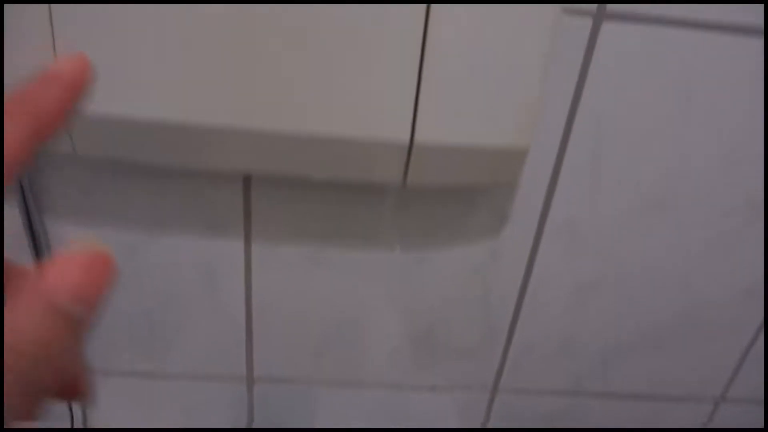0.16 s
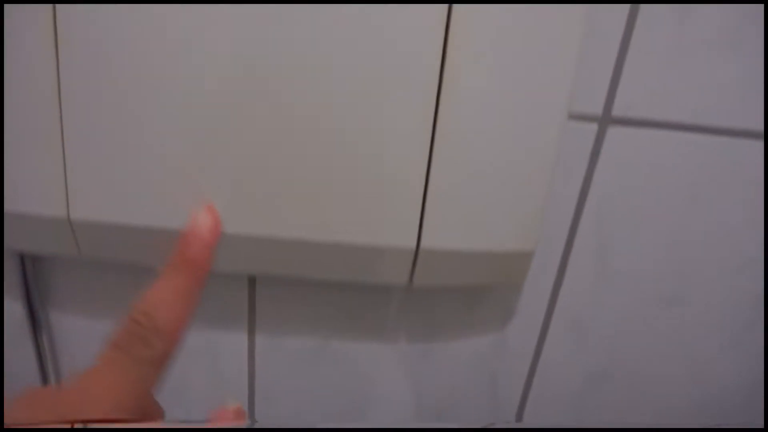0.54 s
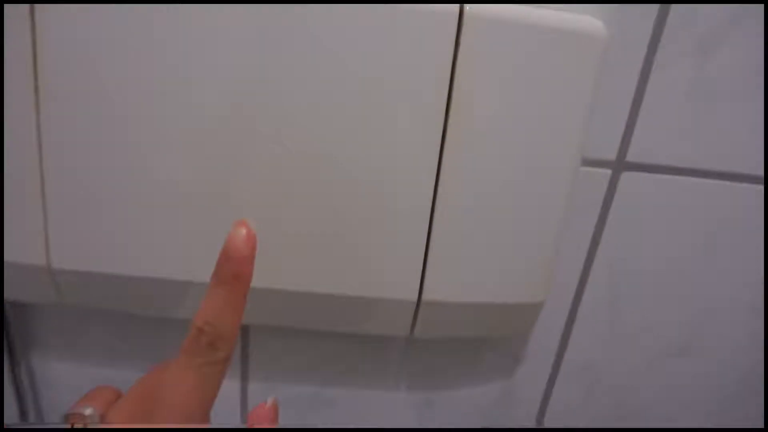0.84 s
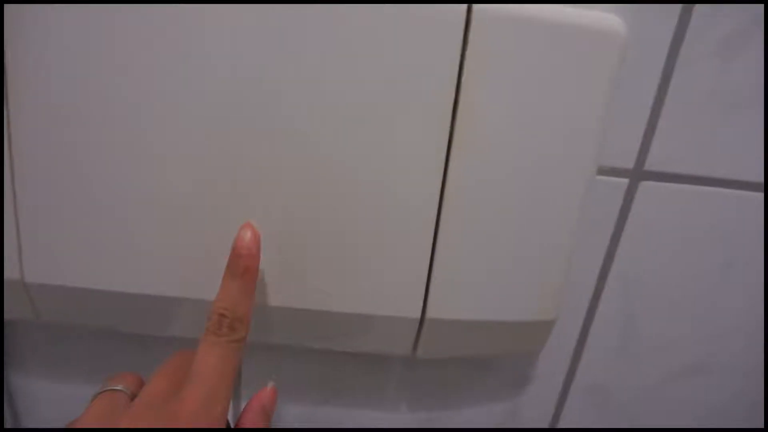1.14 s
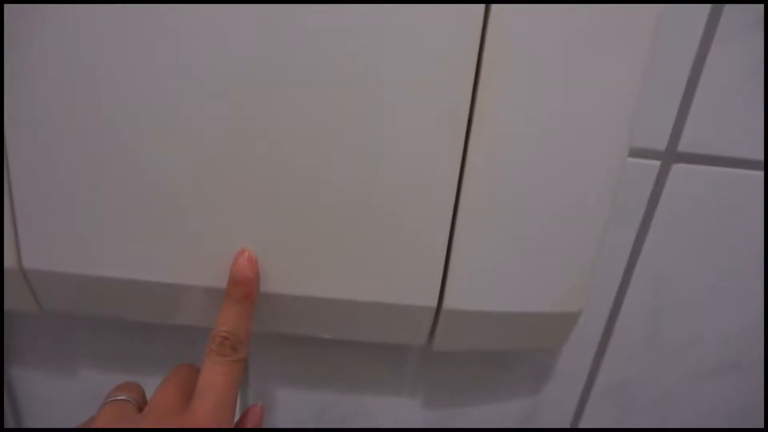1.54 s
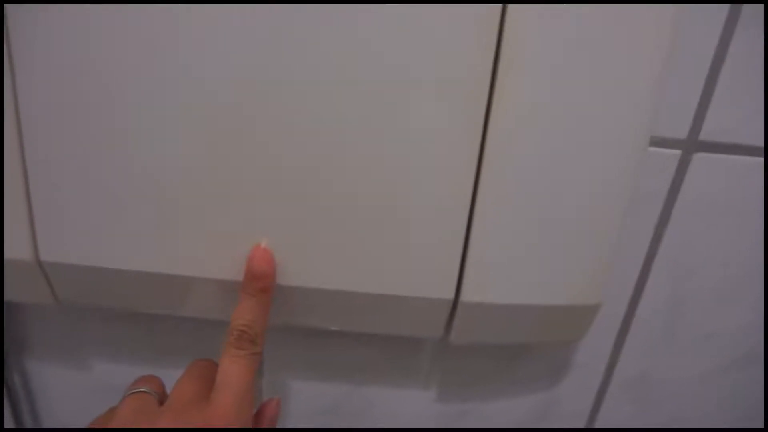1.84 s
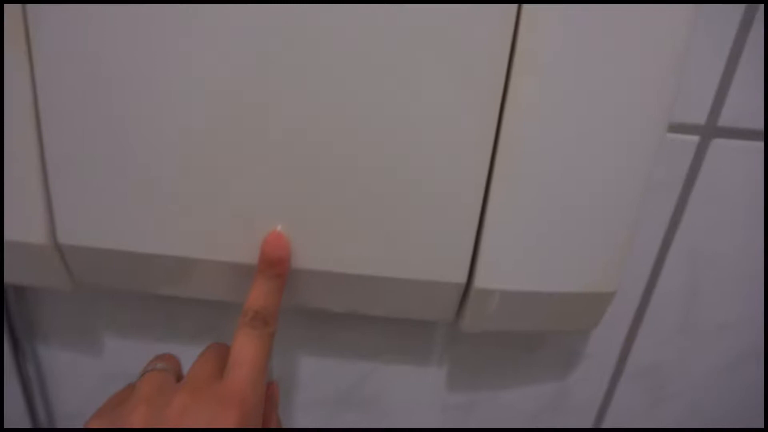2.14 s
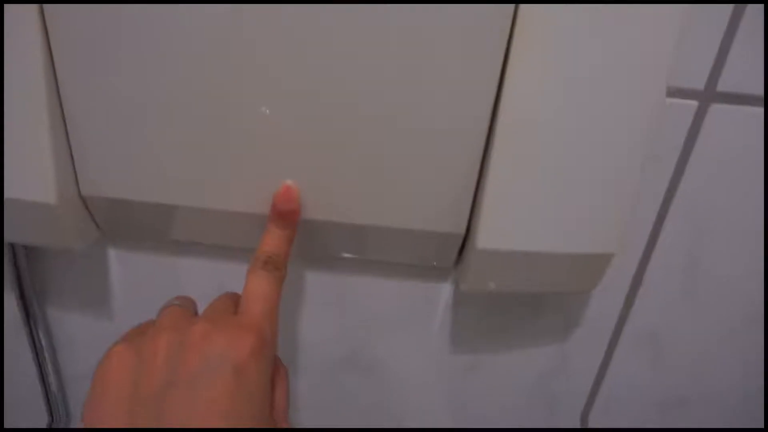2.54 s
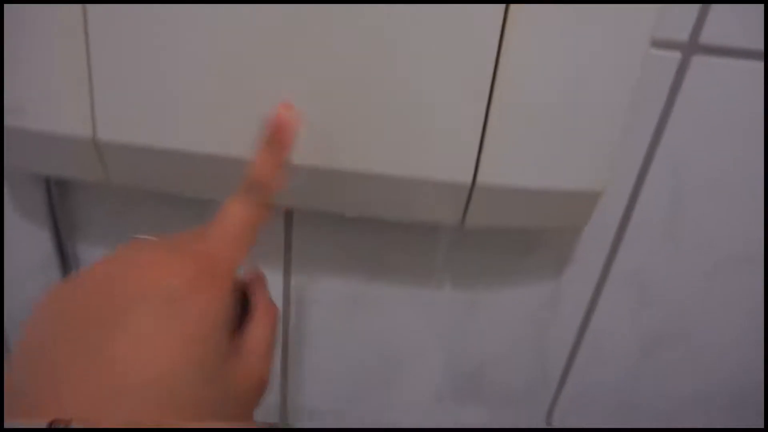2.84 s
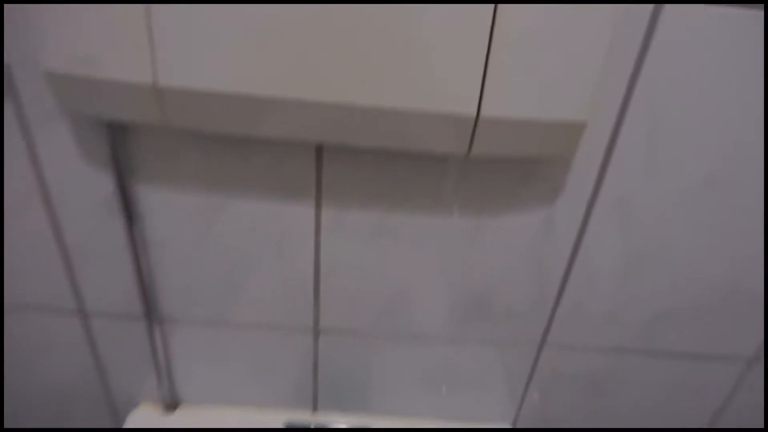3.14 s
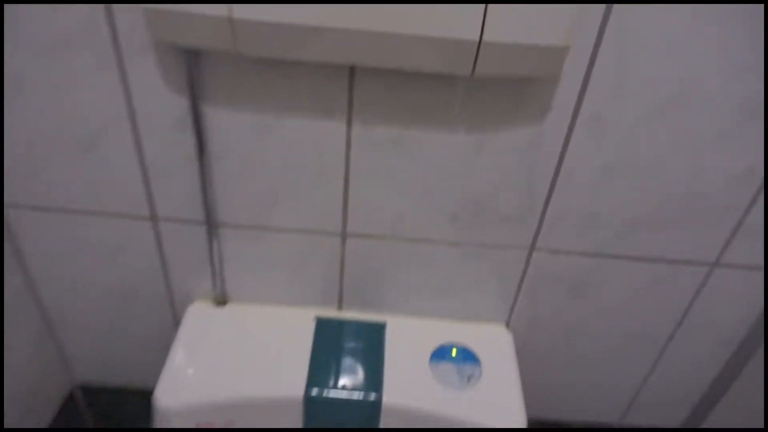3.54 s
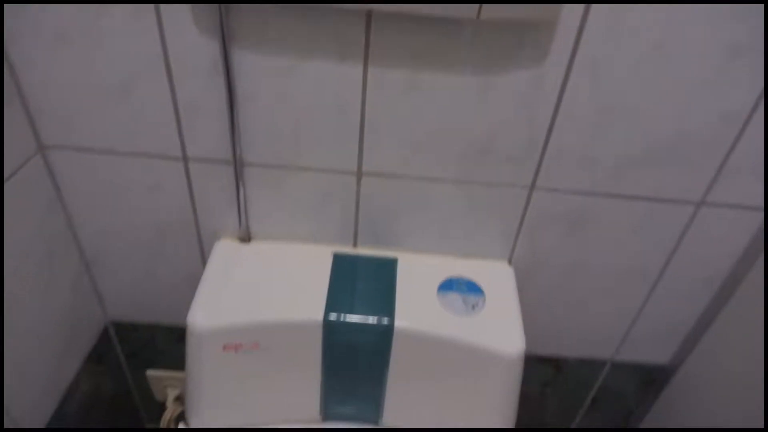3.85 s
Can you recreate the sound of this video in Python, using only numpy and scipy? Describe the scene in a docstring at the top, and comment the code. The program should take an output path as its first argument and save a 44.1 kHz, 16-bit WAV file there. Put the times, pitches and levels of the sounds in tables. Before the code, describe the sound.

A toilet flush in a small tiled restroom: near silence, light plastic clicks as a finger presses the cistern plate, a sharp clack, then gulping water bursts into a loud splashing rush, recorded close with a handheld stereo microphone.

```python
"""A small tiled restroom hums quietly, with soft air noise and a faint electrical whine: noise and sines.
Close by, a finger presses the plastic plate of a wall cistern: cracks of noise and decaying rings click and knock.
The valve jolts the pipe, air gulps as rising tones, and squirts of water sing through narrow resonances.
Water bursts into the bowl and settles into a loud rush of rumble, bubbles, splashes and spray.
Two microphones in a swaying hand hear it all, alike in the bass and apart in the treble."""
import sys
import numpy as np
from scipy import signal
from scipy.fft import rfft, irfft
from scipy.io import wavfile

SR = 44100
rng = np.random.default_rng(int(sys.argv[2]) if len(sys.argv) > 2 else 0)


def materialize(psi):
    """Save the field psi as 16-bit PCM at rate SR to the path in sys.argv[1].

    A 1-D psi becomes a single channel; in a 2-D psi each row is a channel.
    """
    bounded = np.clip(np.atleast_2d(psi).T, -1, 1)
    quanta = np.round(bounded * 32767).astype(np.int16)
    wavfile.write(sys.argv[1], SR, quanta)


N = 176400
T = np.arange(N) / SR  # time [s]

# Two microphones: likeness of left and right: pitch_hz, likeness [0-1]
LIKENESS = [(250, 1), (500, 0.95), (950, 0.73), (1900, 0.41), (3800, 0.1), (7300, 0.022)]
# phase by which the left leads the right: pitch_hz, lead_radians
LEFT_LEAD = [(400, 0.11), (850, 0.45), (3500, 0.2)]
CUTOFF_HZ = 16000
# Nearest walls: delay_s, level_db
ECHOES = [(.0023, -6), (.0067, -9.5), (.0094, -20)]
# Dying away of the tiled room: pitch_hz, t60_s
ROOM_T60 = [(200, 0.64), (700, 0.69), (1840, 0.41), (4850, 0.43), (12800, 0.25)]
PATH_SWAY = 0.0608  # spread of the echo delays, as a share

# Colour of the air in the quiet room: pitch_hz, level_db
AIR = [(15, -45), (25, -10), (74, -18.5), (141, -1), (354, -8.5), (439, -8), (624, -11), (962, -16.5),
       (3080, -21), (6050, -27.5), (12900, -26), (16000, -32)]
# Resonances of the hum: pitch_hz, width_hz, level_db
HUM = [(137.7, 7.2, 2), (355, 2.4, 1), (438.5, 14.5, 2.5), (797, 22, -12)]
# Electrical whine: pitch_hz, level_db
WHINE = [(9652, -77), (12888, -74), (12947, -78)]
AIR_DB, HUM_DB, HUM_WAVER_DB = -54, -55.5, 1
HUM_SWELL_DB, HUM_SWELL_S = 5.5, 1  # the hum starts this much lower and builds up over this time

# Resonances of the pipe hiss: pitch_hz, width_hz, level_db
PIPE_HISS = [(2170, 400, 5), (2900, 300, -2.5)]
HISS_DB, HISS_FADE_DB_PER_S = -60.5, 3.5
LEAK_START_S, LEAK_HZ, LEAK_WIDTH_HZ, LEAK_DB = 1.7, 1910, 430, -57.5

# Knocks of the plate and its linkage: start_s, level_db, dull_above_hz, thin_below_hz, part_pitch_hz
KNOCKS = [(1.130, -36, 2900, 1600, 1900), (1.2659, -22.5, 14700, 306, 2000),
          (1.510, -24.5, 13800, 490, 3230), (1.558, -16.5, 5140, 258, 5150), (1.563, -13, 1690, 123, 947),
          (1.579, -20, 2800, 300, 1200), (1.979, -20.5, 670, 470, 587), (2.002, -16, 150, 111, 137),
          (2.203, -22.5, 1500, 116, 790), (2.220, -17.5, 2800, 400, 720), (2.299, -19, 3500, 400, 2100),
          (2.315, -16, 15000, 1200, 1890), (2.3645, -2, 14600, 1300, 1700), (2.380, -.5, 4000, 1330, 1910)]
# Ring of the plastic cistern: pitch_hz, level_db, t60_s
CISTERN = [(427, 7.5, 0.44), (484, 3, 0.28), (597, 8, 0.24), (929, 4.5, 0.22), (1119, 7.5, 0.25),
           (2256, 5.5, .17), (2970, 1.5, .2), (4170, -4.5, 0.28), (5230, -6, 0.26)]
# Colour of the contact: pitch_hz, level_db
CRACK = [(100, 4), (400, 6.5), (1100, 4), (2000, 6.5), (4000, -1.5), (6500, -5.5), (12000, -1), (16000, 2)]
CISTERN_DB, CRACK_DB, KNOCK_DIRECT_DB = -32.5, 18, -6
CRACK_DECAY_S = 0.0027  # to 1/e
PART_DB, PART_T60_S, PART_TOP_HZ = -13, 0.047, 2580  # ring of the part hit, weaker the higher its pitch

# Jolts of the flush pipe by the valve: start_s, level_db
JOLTS = [(2.201, -32), (2.219, -26.5), (2.305, -27)]
# Ring of the flush pipe: pitch_hz, level_db, t60_s
PIPE = [(127, 2, 0.16), (659, 2, 0.09), (720, -1.5, 0.27)]

# Air gulps through the flush pipe: start_s, level_db, start_pitch_hz
GULPS = [(2.278, -13.5, 290), (2.413, -7.5, 235), (2.428, -0.5, 295), (2.45, -3.5, 223), (2.476, -4.5, 251),
         (2.531, -0.5, 272), (2.554, -1, 315), (2.981, -3.5, 953), (3.424, -4, 926)]
# Low resonances of bowl and room: pitch_hz, width_hz, level_db
BOWL = [(133, 52, -17), (207, 6, 7), (237.4, 12, 4), (287, 3.2, -2), (325.7, 9.7, 4.5), (447, 12, -13)]
GULP_RISE_PER_S = 9.3  # growth of the pitch, as a share of its start
GULP_PEAK_S, GULP_DB, GULP_RING_DB = 0.00375, -14, 5

# Squirts in the valve and against the bowl: start_s, hold_s, pitch_hz, level_db
JETS = [(2.243, 0.029, 4750, -44), (2.798, 0.093, 2450, -23)]
JET_RELEASE_S = 0.029  # to 1/e
JET_WIDTH_HZ = 620  # of each of two resonances in a row

# Resonances of the running pipe: pitch_hz, width_hz, level_db
DRAIN = [(137, 28, 3.5), (280.2, 12.7, -4.5), (322.5, 14.5, -2.5), (415, 44, -11)]
# Resonances that colour bubbles and splashes: pitch_hz, width_hz, level_db
BASIN = [(681, 40, 6.5), (762, 12, 6.5), (835, 8.7, 5.5), (974, 62, -1), (1029, 30, 0), (1230, 9.6, 1.5)]
# Strength of each part of the rush, before its trim: time_s, level_db
RUMBLE = [(2.2, -45), (2.22, -31.5), (2.4, -32), (2.43, -25.5), (2.796, -31.5), (4.0, -33.5)]
GURGLE = [(2.2, -60), (2.224, -56), (2.25, -58), (2.394, -30), (2.53, -31.5), (2.57, -21.5), (2.66, -28.5),
          (2.746, -20), (2.78, -26.5), (3.41, -22), (3.428, -17), (3.46, -22.5), (3.888, -22.5),
          (3.91, -17), (3.97, -25)]
SPLASH = [(2.2, -48), (2.22, -42), (2.29, -45.5), (2.304, -29.5), (2.35, -43), (2.38, -24), (2.47, -30.5),
          (2.5, -22), (2.6, -22.5), (2.886, -23.5), (2.922, -26), (3.092, -22), (3.252, -27.5),
          (3.368, -23.5), (4.0, -24.5)]
SPRAY = [(2.2, -85), (2.254, -46), (2.304, -44), (2.32, -34), (2.354, -53), (2.364, -31), (2.464, -40.5),
         (2.49, -27), (2.64, -32.5), (2.666, -23.5), (2.70, -28), (3.036, -29), (3.052, -20),
         (3.085, -24.5), (3.28, -27), (3.54, -25.5), (3.572, -22), (3.61, -25.5), (4.0, -24.5)]
# Colour of each part of the rush: pitch_hz, level_db
RUMBLE_COLOUR = [(25, -17), (80, -23), (118, -11.5), (330, 8), (500, -2), (800, 5), (2000, -57)]
GURGLE_COLOUR = [(80, -50), (200, -6.5), (400, -7.5), (650, -3), (1000, 2.5), (1350, 3.5), (2000, -12),
                 (5000, -54)]
SPLASH_COLOUR = [(100, -33), (500, -27), (1100, -5.5), (1600, 0.5), (2600, -0.5), (3600, -5), (4800, -8.5),
                 (7000, -18), (16000, -52)]
SPRAY_COLOUR = [(100, -45), (1500, -18), (3500, 1), (5000, 0.5), (9500, 0.2), (13000, 1.8), (16000, -3)]
RUMBLE_DB, GURGLE_DB, SPLASH_DB, SPRAY_DB = 1, -0.5, 1.5, 3  # trims
RUMBLE_WASH_DB, ONSET_S = -15, 0.0098
BUBBLES_PER_S, BUBBLE_LOW_HZ, BUBBLE_HIGH_HZ = 1300, 425.4, 1798
BUBBLE_CYCLES = 11  # in the time a bubble falls to 1/e
BUBBLE_RISE, BUBBLE_SPREAD_DB, CHURN_DB = .02, 3.5, 5
SPLASHES_PER_S, DROPS_PER_S = 2500, 5900
SPRAY_PAN_DB = 0.8  # up on the left, down on the right
SURGE_RATE_HZ, SURGE_DB, GURGLE_FLUTTER_DB, SPRAY_FLUTTER_DB = 20, .45, .5, .8


def from_db(db):
    """Decibels to gain."""
    return 10 ** (np.asarray(db) / 20)


def rms_one(x):
    """Scale to unit power."""
    return x / np.sqrt(np.mean(x ** 2) + 1e-20)


def at_hz(points, hz):
    """Read a table on a log-frequency axis."""
    points = np.array(points)
    return np.interp(np.log(hz + 1), np.log(points[:, 0]), points[:, 1])


def bins(x):
    """Frequencies of a signal's spectrum."""
    return np.fft.rfftfreq(x.shape[-1], 1 / SR)


def coloured(x, colour):
    """Give a signal a spectral shape."""
    return irfft(rfft(x) * from_db(at_hz(colour, bins(x))), x.shape[-1])


def butter(x, hz, kind, order=2):
    """Causal low- or high-pass."""
    sections = signal.butter(order, np.clip(hz, 10, SR / 2 - 100), kind, fs=SR, output="sos")
    return signal.sosfilt(sections, x + 1e-18)


def resonate(x, table):
    """Parallel resonances, each with its own gain on top."""
    out = 0
    for hz, width, db in table:
        radius = np.exp(-np.pi * width / SR)
        feed = np.array([1, 0, -1]) * (1 - radius * radius) / 2
        feedback = [1, -2 * radius * np.cos(2 * np.pi * hz / SR), radius * radius]
        out = out + from_db(db) * signal.lfilter(feed, feedback, x + 1e-18)
    return out


def drift(rate):
    """Slow chance with spread 1, weaker in its changes above the rate in Hz."""
    return rms_one(irfft(rfft(rng.standard_normal(N)) / (1 + (bins(T) / rate) ** 2), N))


def add(track, s, sound):
    """Mix a sound in at a time."""
    start = int(s * SR)
    track[..., start:start + sound.shape[-1]] += sound[..., :N - start]


def stereo(pair):
    """Two unrelated signals reach two microphones: alike in the bass, the left ahead in phase."""
    (mid, side), hz = rfft(pair), bins(pair)
    alike = np.clip(at_hz(LIKENESS, hz), -1, 1)
    sign = np.array([[1], [-1]])
    spectrum = np.sqrt((1 + alike) / 2) * mid + np.sqrt((1 - alike) / 2) * side * sign
    return irfft(spectrum * np.exp(.5j * sign * at_hz(LEFT_LEAD, hz)), pair.shape[-1])


def noise():
    """White noise at the two microphones."""
    return stereo(rng.standard_normal((2, N)))


def near_walls(x):
    """First reflections, on paths to each microphone that change as it sways in the hand."""
    def echo(channel, s):
        """One wall."""
        delay = s * (1 + PATH_SWAY * drift(0.502))
        return np.interp(T - delay, T, channel)
    return np.array([channel + sum(from_db(db) * echo(channel, s) for s, db in ECHOES) for channel in x])


def reflections(colour):
    """A click's dense reflections from the tiles, each band of noise decaying at its own rate."""
    t, edges = T[:SR // 2], np.geomspace(20, SR / 2, 13)
    source = rfft(coloured(stereo(rng.standard_normal((2, len(t)))), colour))
    hz, tail = bins(t), 0
    for low, high in zip(edges, edges[1:]):
        band = irfft(source * ((hz >= low) & (hz < high)), len(t))
        tail = tail + band * from_db(-60 * t / at_hz(ROOM_T60, np.sqrt(low * high)))
    return tail * np.sqrt(2 * np.log(1000) / (ROOM_T60[-1][1] * SR))


def struck(modes):
    """Ring of a body after one blow, each mode with a strength of its own."""
    t, out = T[:SR // 2], 0
    for hz, db, t60 in modes:
        decay = from_db(db + rng.normal(0, 1) - 60 * t / t60)
        out = out + decay * np.sin(2 * np.pi * hz * t) * rng.choice([-1, 1])
    return out


def background():
    """Soft air noise, a wavering hum of resonant noise and a thin electrical whine of sines."""
    air = from_db(AIR_DB) * rms_one(coloured(noise(), AIR))
    swell_db = -HUM_SWELL_DB * np.maximum(1 - T / HUM_SWELL_S, 0)
    hum = from_db(HUM_DB + swell_db) * rms_one(resonate(noise(), HUM))
    hum = hum * from_db(HUM_WAVER_DB * drift(rate=6.2))
    whine = sum(from_db(db) * np.sin(2 * np.pi * hz * T) for hz, db in WHINE)
    return air + hum + whine


def pipes():
    """A fading hiss in the pipes, and the thin song of the valve as it starts to leak."""
    hiss = from_db(HISS_DB - HISS_FADE_DB_PER_S * T) * rms_one(resonate(noise(), PIPE_HISS))
    leak = from_db(LEAK_DB) * rms_one(resonate(noise(), [(LEAK_HZ, LEAK_WIDTH_HZ, 0)]))
    return hiss + leak * np.clip((T - LEAK_START_S) / .1, 0, 1)


def knocks():
    """Each contact is a short crack, its reflections and rings of case and part, filtered dull or thin."""
    out, t = np.zeros((2, N)), T[:SR // 2]
    for s, db, dull_hz, thin_hz, part_hz in KNOCKS:
        crack = coloured(stereo(rng.standard_normal((2, len(t)))), CRACK)
        crack = crack * np.exp(-t / CRACK_DECAY_S) / np.sqrt(CRACK_DECAY_S * SR)
        contact = from_db(CRACK_DB) * (from_db(KNOCK_DIRECT_DB) * crack + reflections(CRACK) / 2)
        case = from_db(CISTERN_DB) * struck(CISTERN)
        part = butter(struck([(part_hz, PART_DB, PART_T60_S)]), PART_TOP_HZ, "low")
        knock = butter(contact + case + part, dull_hz, "low", order=3)
        add(out, s, from_db(db) * butter(knock, thin_hz, "high", order=3))
    return out


def jolts():
    """The opening valve thumps the pipe, which rings in a few decaying modes."""
    out = np.zeros(N)
    for s, db in JOLTS:
        add(out, s, from_db(db) * struck(PIPE))
    return butter(butter(out, hz=101, kind="high", order=3), hz=1000, kind="low")


def gulps():
    """Large air pockets ring briefly, rise in pitch and, when low, set the bowl booming."""
    out, t = np.zeros(N), T[:SR // 10]
    for s, db, hz in GULPS:
        swell = t / GULP_PEAK_S
        cycles = np.cumsum(hz * (1 + GULP_RISE_PER_S * t)) / SR
        add(out, s, from_db(db + GULP_DB) * swell * np.exp(1 - swell) * np.sin(2 * np.pi * cycles))
    return butter(out, hz=131, kind="high") + from_db(GULP_RING_DB) * resonate(out, BOWL)


def drops(rate, spread_db, wash_db):
    """Dense impacts of drops on porcelain, over the smooth wash of their reflections."""
    sizes = from_db(spread_db * np.minimum(rng.exponential(1, (2, N)), 4))
    sizes = sizes * rng.choice([-1, 1], (2, N))
    impacts = sizes * (rng.random((2, N)) < rate / SR)
    return rms_one(stereo(impacts)) + from_db(wash_db) * noise()


def jet():
    """Short squirts of drops sing, each through one narrow resonance applied twice."""
    out, water = 0, drops(DROPS_PER_S, spread_db=4.5, wash_db=0)
    for s, hold_s, hz, db in JETS:
        tone = [(hz, JET_WIDTH_HZ, 0)]
        envelope = (T > s) * np.exp(-np.maximum(T - s - hold_s, 0) / JET_RELEASE_S)
        out = out + from_db(db) * envelope * rms_one(resonate(resonate(water, tone), tone))
    return out


def bubbles():
    """Bubbles of random size ring for some cycles each, rising in pitch, all over the bowl."""
    out = np.zeros((2, N))
    for when, size, strength, place in rng.random((int(BUBBLES_PER_S * N / SR), 4)):
        hz = BUBBLE_LOW_HZ * (BUBBLE_HIGH_HZ / BUBBLE_LOW_HZ) ** size
        age = T[:int(4 * BUBBLE_CYCLES / hz * SR)] * hz / BUBBLE_CYCLES  # in decay times
        ring = np.exp(-age) * np.sin(2 * np.pi * BUBBLE_CYCLES * age * (1 + BUBBLE_RISE * age))
        pan = np.sin(2 * np.pi * place + np.array([[0], [np.pi / 2]]))
        gain = from_db(BUBBLE_SPREAD_DB * min(-np.log(strength), 4)) * pan
        add(out, when * N / SR, gain * ring)
    return rms_one(stereo(out))


def flow(curve):
    """Gain of one part of the rush, silent until the valve opens."""
    s, db = np.transpose(curve)
    return from_db(np.interp(T, s, db)) * np.clip((T - s[0]) / ONSET_S, 0, 1)


def rush():
    """Rumble, gurgling bubbles, splashes and fine spray; all but the steady rumble surge together."""
    surge = drift(SURGE_RATE_HZ)

    def part(x, colour, db, surge_db, flutter_db):
        """Colour one part, and let it surge with the others and flutter alone."""
        sway_db = surge_db * surge + flutter_db * drift(rate=15)
        return from_db(db) * rms_one(coloured(x, colour) * from_db(sway_db))

    turbulence = noise()
    running = resonate(turbulence, DRAIN) + from_db(RUMBLE_WASH_DB) * turbulence
    rumble = part(running, RUMBLE_COLOUR, RUMBLE_DB, surge_db=-0.05, flutter_db=0.0)

    churn = bubbles() + from_db(CHURN_DB) * noise()
    churn = churn + resonate(churn, BASIN)
    gurgle = part(churn, GURGLE_COLOUR, GURGLE_DB, SURGE_DB, GURGLE_FLUTTER_DB)

    slaps = drops(SPLASHES_PER_S, spread_db=3.5, wash_db=2)
    slaps = near_walls(slaps) + resonate(slaps, BASIN)
    splash = part(slaps, SPLASH_COLOUR, SPLASH_DB, SURGE_DB, SPRAY_FLUTTER_DB)

    fine = near_walls(drops(DROPS_PER_S, spread_db=7.5, wash_db=5.0))
    spray = part(fine, SPRAY_COLOUR, SPRAY_DB, SURGE_DB, SPRAY_FLUTTER_DB)
    spray = spray * from_db([[SPRAY_PAN_DB], [-SPRAY_PAN_DB]])
    return rumble * flow(RUMBLE) + gurgle * flow(GURGLE) + splash * flow(SPLASH) + spray * flow(SPRAY)


def scene():
    """The room, the press and the flush."""
    return background() + pipes() + knocks() + jolts() + gulps() + jet() + rush()


def record(dry):
    """The top is cut steeply."""
    return signal.sosfilt(signal.ellip(12, .1, 80, CUTOFF_HZ, fs=SR, output="sos"), dry)


dry = scene()
out = record(dry)
materialize(out)
```